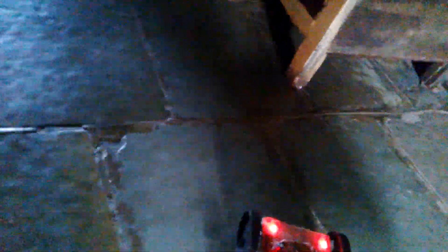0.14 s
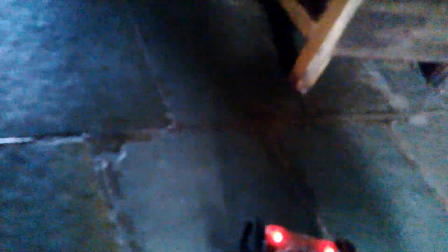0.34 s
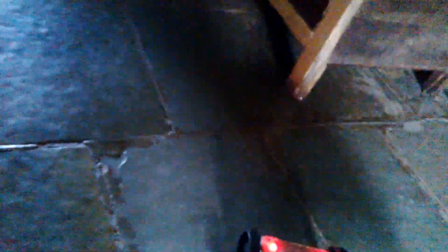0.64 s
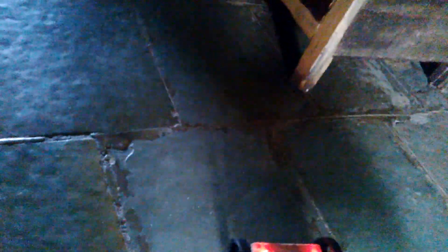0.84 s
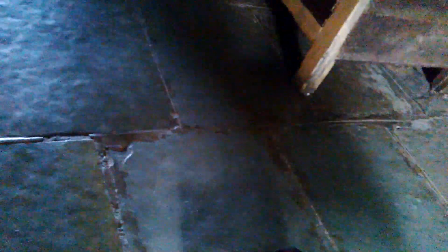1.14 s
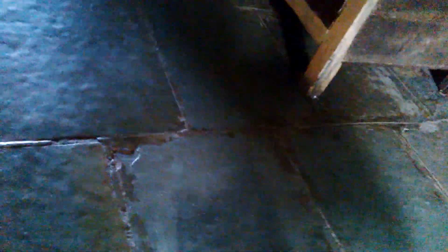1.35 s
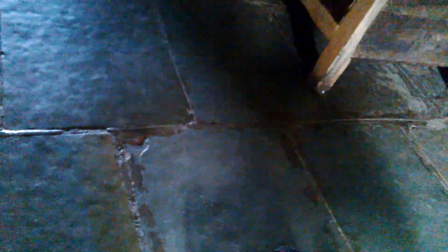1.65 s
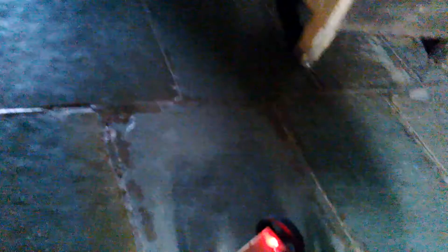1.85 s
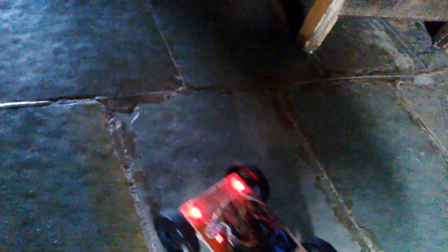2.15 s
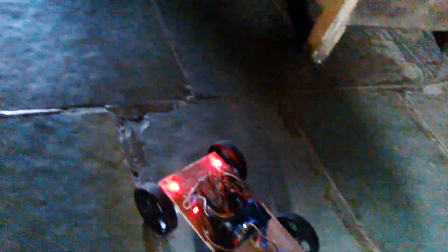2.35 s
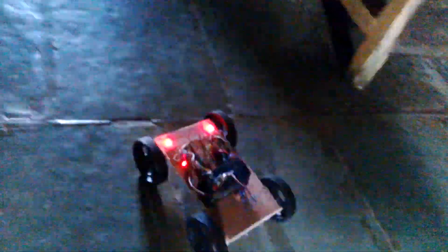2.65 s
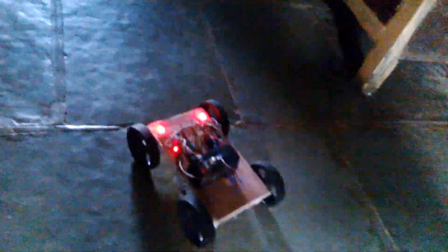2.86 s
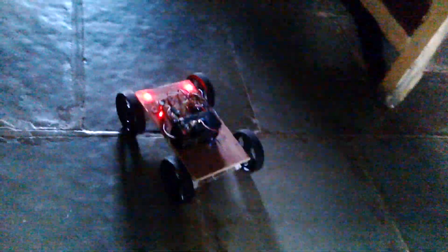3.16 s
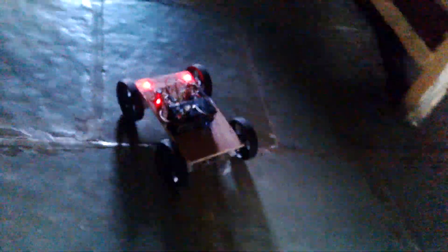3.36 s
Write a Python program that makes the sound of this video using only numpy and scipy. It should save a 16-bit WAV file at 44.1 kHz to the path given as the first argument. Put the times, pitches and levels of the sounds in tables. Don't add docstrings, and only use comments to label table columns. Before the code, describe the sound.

Small electric gear motors of a toy robot car whir in two bursts on a stone floor

```python
import sys
import numpy as np
from scipy import signal
from scipy.fft import rfft, irfft, next_fast_len
from scipy.io import wavfile
from scipy.ndimage import uniform_filter1d, map_coordinates

SR = 44100
rng = np.random.default_rng(int(sys.argv[2]) if len(sys.argv) > 2 else 0)


def int16_out(signal):
    q = np.round(np.clip(np.atleast_2d(signal).T, -1, 1) * 32767)
    wavfile.write(sys.argv[1], SR, q.astype(np.int16))


def magnitude_from_level(level_db):
    exponent = np.asarray(level_db, float) / 20
    return 10 ** exponent


N = 154350
T = np.arange(N) / SR


def unit(x):
    return x / np.sqrt(np.mean(x ** 2) + 1e-20)


def along(points, hz):
    f, v = np.transpose(points)
    return np.interp(np.log(hz + 1), np.log(f + 1), v)


def curves(rows):
    s, *cols = np.transpose(rows)
    return [np.interp(T, s, c) for c in cols]


def wobble(rate):
    return map_coordinates(rng.standard_normal(500), [np.clip(T * rate, 0, 498)])


def filtered(x, response):
    m = next_fast_len(N + SR // 2)
    return irfft(rfft(x, m) * response(np.fft.rfftfreq(m, 1 / SR)), m)[..., :N]


def patchy(x, depth_db):
    z = signal.stft(x, nperseg=512)[2]
    field = rng.standard_normal(z.shape[-2:])
    field = uniform_filter1d(field, size=3, axis=0)
    field = uniform_filter1d(field, size=7, axis=1)
    return signal.istft(z * magnitude_from_level(depth_db * unit(field)), nperseg=512)[1][..., :N]


def spread(pair, alike):
    def mixing(hz):
        turn = np.arccos(np.clip(along(alike, hz), -1, 1)) / 2
        return np.array([np.cos(turn), np.sin(turn)])

    mid, side = filtered(pair, mixing)
    return np.array([mid + side, mid - side])


def hush(spectrum, alike):
    noise = spread(rng.standard_normal((2, N)), alike)
    return unit(filtered(noise, lambda hz: magnitude_from_level(along(spectrum, hz))))


def ring(x, hz, width):
    return filtered(x, lambda f: 1j * f * width / (hz * hz - f * f + 1j * f * width))


def air(alike):
    # f/Hz, level/dB
    hush_spectrum = [(15, -31), (25, -7.5), (264, -10), (354, -6.5), (573, -14), (1210, -18), (8780, -27),
                     (11800, -30), (15000, -38)]
    # f/Hz, level/dB
    rumble_spectrum = [(15, -39), (25, -1), (86, -1), (140, -2), (180, -53), (310, -120)]
    return magnitude_from_level(-52.5) * patchy(hush(hush_spectrum, alike), 2.9) + magnitude_from_level(-65) * hush(rumble_spectrum, alike)


def rustle(alike):
    # f/Hz, level/dB
    spectrum = [(530, -47), (900, -23), (1010, -20), (1380, -5), (4210, -4.5), (12600, -15), (13000, -25)]
    # t/s, level/dB
    swell = [(0, -68), (.12, -52.5), (.41, -52.5), (.49, -65), (.6, -85)]
    level_db = curves(swell)[0] + 1.4 * np.tanh(wobble(29.0))
    return magnitude_from_level(level_db) * patchy(hush(spectrum, alike), 4.4)


def creak():
    # t/s, f/Hz, level/dB
    glide = [(.26, 266.6, -66), (.3, 301, -58), (.345, 331, -43.5), (.4, 334, -63), (.45, 383, -60),
             (.5, 380, -91.5)]
    hz, db = curves(glide)
    phase = 2 * np.pi * np.cumsum(hz * (1 + 0.061 * wobble(58.7))) / SR
    octave = magnitude_from_level(-5 + 4 * wobble(28.0)) * np.sin(2 * phase)
    started = T > glide[0][0] - .03
    return magnitude_from_level(db) * started * (np.sin(phase) + octave) * [[1.2], [.6]]


def whine():
    # f/Hz, level/dB
    tones = [(12118, -68.5)]
    return sum(magnitude_from_level(db + 5.0 + 1.5 * wobble(6.8)) * np.sin(2 * np.pi * f * T) for f, db in tones)


def background():
    alike = [(60, 0.59), (640, 0.73), (1400, 0.37), (5000, 0.056)]  # f/Hz, coherence
    return air(alike) + rustle(alike) + creak() + whine()


def room(x):
    # f/Hz, t60/s
    decay = [(150, 1), (500, 0.66), (2000, 0.81), (8000, 0.59), (14000, 0.39)]
    out, step = np.zeros((2, N + 2 * SR)), SR // 4
    for at in range(2 * step, N, step):
        hz, t, z = signal.stft(rng.standard_normal((2, SR)), SR, nperseg=256)
        tail = signal.istft(z * magnitude_from_level(-60 * t / along(decay, hz)[:, None]), SR, nperseg=256)[1]
        piece = x[:, at - step:at + step]
        piece = piece * np.sqrt(np.hanning(2 * step))[:piece.shape[1]]
        wet = signal.fftconvolve(piece, tail / np.linalg.norm(tail[0]), axes=1)
        out[:, at - step + 300:][:, :wet.shape[1]] += wet
    return out[:, :N]


def clicks():
    # t/s, peak level/dB
    ticks = [
        (0.5875, -37.5),
        (0.656, -36),
        (1.8195, -32),
        (1.838, -35),
        (1.8851, -34),
    ]
    # f/Hz, level/dB
    colour = [(1000, -7), (4000, -2), (9000, 0), (14000, -4)]
    shape = sum(magnitude_from_level(db - 60 * np.clip(T - s, 0, 1) / 0.015) * (T >= s) for s, db in ticks)
    return shape * unit(filtered(rng.standard_normal((2, N)), lambda hz: magnitude_from_level(along(colour, hz))))


def teeth():
    contacts_per_s, scatter_db = 5000, 2.5
    hit = rng.random((2, N)) < contacts_per_s / SR
    size = magnitude_from_level(scatter_db * rng.standard_normal((2, N))) * rng.choice([-1, 1], (2, N))
    return unit(hit * size)


def creep():
    # start t/s, end t/s, first level/dB, last level/dB
    strains = [
        (.5875, 0.66, -51, -49),
        (1.818, 1.92, -45, -36),
    ]
    # f/Hz, level/dB
    colour = [(700, -17), (1200, -11), (3500, -2), (5000, -10.5), (9000, -9), (15800, -12)]
    shape = sum(magnitude_from_level(np.interp(T, [a, b], [first_db, last_db])) * (T > a) * (T < b)
                for a, b, first_db, last_db in strains)
    return shape * unit(filtered(patchy(teeth(), 2.6), lambda hz: magnitude_from_level(along(colour, hz))))


def windings():
    # t/s, level/dB
    strength = [(.56, -68), (.59, -50.5), (.66, -66), (.8, -37), (1.38, -40), (1.5, -53), (1.8, -57),
                (1.85, -51), (1.9, -39), (1.95, -39), (2.1, -46), (2.2, -57), (3.5, -35.5)]
    buzz_hz, width_hz = 950, 200
    buzz = ring(ring(rng.standard_normal((2, N)), buzz_hz, width_hz), buzz_hz, width_hz)
    return magnitude_from_level(curves(strength)[0] + 1.5 * wobble(20)) * unit(buzz)


def judders():
    # t/s, f/Hz, length/s, level/dB
    chassis_flares = [(0.696, 538, 0.02, -25.5), (0.742, 581, 0.051, -30), (0.846, 775, 0.021, -23.5),
                      (1.127, 818, 0.012, -21), (1.185, 624, 0.008, -15), (1.265, 926, 0.014, -20),
                      (1.311, 624, 0.012, -19.5), (1.333, 904, 0.018, -23.9), (1.359, 624, 0.023, -34),
                      (1.401, 495, 0.011, -21), (1.854, 754, 0.012, -44.5), (1.918, 517, 0.014, -24.5),
                      (1.948, 969, 0.018, -25.5), (1.952, 603, 0.013, -27), (1.972, 947, 0.008, -26),
                      (2.045, 883, 0.035, -27), (2.069, 969, 0.021, -24.5), (2.105, 689, 0.036, -28.5),
                      (2.111, 947, 0.016, -27.2), (2.129, 517, 0.02, -25.9), (2.221, 732, 0.036, -25),
                      (2.235, 560, 0.034, -25.5), (2.251, 732, 0.013, -22.2), (2.319, 775, 0.019, -20.5),
                      (2.351, 754, 0.018, -21), (2.428, 754, 0.017, -18.5), (2.452, 775, 0.037, -26),
                      (2.544, 775, 0.012, -20), (2.598, 775, 0.026, -29), (2.62, 624, 0.11, -34),
                      (2.644, 603, 0.044, -26), (2.67, 624, 0.044, -31.5), (2.734, 624, 0.009, -20),
                      (3.021, 754, 0.018, -18.5), (3.059, 775, 0.01, -24), (3.151, 754, 0.016, -30),
                      (3.231, 754, 0.018, -21), (3.293, 603, 0.022, -22)]
    # t/s, f/Hz, length/s, level/dB
    mount_flares = [(0.676, 1938, 0.012, -25.5), (0.76, 2929, 0.022, -30), (0.882, 2304, 0.022, -21),
                    (0.942, 2778, 0.016, -39), (1.109, 2525, 0.049, -26.5), (1.389, 2907, 0.012, -22),
                    (1.854, 3424, 0.012, -47), (1.878, 3480, 0.022, -38), (1.944, 2024, 0.016, -26.5),
                    (1.974, 2730, 0.01, -29), (2.055, 2562, 0.0097, -23), (2.059, 3380, 0.05, -25.5),
                    (2.075, 3650, 0.012, -20), (2.349, 1507, 0.038, -25.5), (2.528, 2476, 0.016, -25.5),
                    (2.608, 2440, 0.013, -23.5), (2.674, 3100, 0.016, -25), (2.812, 1620, 0.013, -28.3),
                    (2.899, 2110, 0.01, -21), (2.911, 1852, 0.012, -20), (3.045, 1873, 0.0059, -15.5),
                    (3.199, 1760, 0.035, -26), (3.283, 4500, 0.031, -27), (3.346, 1895, 0.014, -21),
                    (3.37, 2140, 0.044, -27.7), (3.38, 1787, 0.026, -27.1), (3.462, 1790, 0.01, -31),
                    (3.494, 1620, 0.008, -26)]
    drift_share, swing_db, trim_db = .03, 2.8, 0.5
    out, span = np.zeros(N + SR), np.arange(-SR // 10, SR // 10)
    for s, hz, length, db in list(chassis_flares) + list(mount_flares):
        knots = rng.standard_normal((2, 20))
        drift, swing = (map_coordinates(row, [np.linspace(0, 19, len(span))]) for row in knots)
        spread_s = length * np.where(span < 0, .38, .45)
        shape = np.exp(-.5 * (span / SR / spread_s) ** 2)
        phase = 2 * np.pi * np.cumsum(hz * (1 + drift_share * drift)) / SR
        out[round(s * SR) + span] += magnitude_from_level(db + swing_db * np.tanh(swing)) * shape * np.sin(phase)
    return np.sqrt(2) * magnitude_from_level(trim_db) * np.array([out[:N], 0.14 * out[:N]])


def chassis(knocks, modes):
    swing_db, swing_per_s = 5, 45
    body = 0
    for hz, width, db in modes:
        drive = knocks * magnitude_from_level(swing_db * np.tanh(wobble(swing_per_s)))
        body = body + magnitude_from_level(db) * ring(ring(drive, hz, 1.12 * width), hz, 1.12 * width)
    return unit(body)


def housing(colour):
    return unit(filtered(patchy(teeth(), 3), lambda hz: magnitude_from_level(along(colour, hz))))


def motors():
    # t/s, effort level/dB, level of gearboxes facing the microphone/dB
    legs = [
        [(.66, -47, 1), (.672, -37, 5), (.69, -27, 2.5), (.82, -24.5, 3), (.91, -18, -2), (1.07, -22.5, -1),
         (1.2, -17.5, -3), (1.34, -19, -1.5), (1.4, -20.5, -7.5)],
        [(1.905, -34, -5.5), (1.95, -22.5, -1), (2.015, -30, 4), (2.055, -21, -2.5), (2.16, -23.5, -1),
         (2.25, -21, 0), (2.29, -24.5, 1)],
        [(2.31, -25, 0), (2.39, -20.5, 0.089), (2.46, -21.5, 0), (2.5, -24, 0), (2.57, -21, 0),
         (2.62, -21, -0.067), (2.69, -22.5, 0), (2.74, -26, -0.5)],
        [(2.76, -21.5, -2), (2.82, -20, 2.5), (2.905, -18.5, 2.5), (2.94, -20.5, -1.4), (3.07, -20.5, 1.5),
         (3.16, -21.5, 0.5), (3.22, -21.5, 0), (3.3, -20.5, -0.8), (3.5, -20.5, -0.5)],
    ]
    # t/s, heading (0 back, 1 forward, 2 turned)
    heading_path = [(1.6, 0.27), (1.7, 0.66), (2.72, 1.03), (2.84, 2.1)]
    # f/Hz, width/Hz, level/dB
    backing = [(538, 29, -10), (626, 60, 1.5), (712, 112, -0.5), (893, 100, -1), (2423, 73, -6),
               (2840, 720, -4.5)]
    forward = [(276, 86, -5), (573, 135, 1.5), (764.5, 100, 4.5), (1519, 34, -5), (2340, 710, -4),
               (3370, 410, -3), (6400, 290, -12), (9600, 900, -9.5)]
    turned = [(287, 83, -10), (596, 110, -1), (747, 116, 0), (924, 110, -15.5), (1542, 59, -7),
              (1766, 530, -4), (2150, 61, -10), (4440, 570, -8), (9700, 570, -8.5), (10840, 860, -9)]
    # f/Hz, level/dB
    colours = [
        [(88, -46), (150, -20.5), (486, -8.5), (608, -10), (1280, -9.5), (2870, -8), (10200, -10.5),
         (13000, -17), (15500, -22)],
        [(88, -38), (150, -24.5), (273, -11), (411, -12), (761, -8.5), (1250, -18), (3450, -13.5), (13000, -17)],
        [(88, -59), (150, -26), (761, -6), (1260, -17.5), (1830, -15), (2660, -11), (4570, -10.5),
         (13000, -14.5)],
    ]
    effort, facing_db = np.zeros(N), np.zeros(N)
    for leg in legs:
        level_db, face_db = curves(leg)
        on = (T > leg[0][0] - .011) & (T < leg[-1][0] + .011)
        effort[on], facing_db[on] = magnitude_from_level(level_db)[on], face_db[on]
    effort = uniform_filter1d(effort, size=200) * magnitude_from_level(0.84 * wobble(14))
    heading, = curves(heading_path)
    knocks, body, fizz = teeth(), 0, 0
    for k, (modes, colour) in enumerate(zip([backing, forward, turned], colours)):
        share = np.sqrt(np.clip(1 - abs(heading - k), 0, 1))
        body = body + share * chassis(knocks, modes)
        fizz = fizz + share * housing(colour)
    whir = magnitude_from_level(-4) * body + magnitude_from_level(3 + facing_db) * fizz
    roll_hz, rise_s = 380, 0.075
    roll = filtered(whir, lambda hz: 1 / (1 + (hz / roll_hz) ** 8))
    slow = sum(np.clip(1 - abs(T - leg[0][0]) / rise_s, 0, 1) ** .5 for leg in legs[:2])
    return effort * (whir - slow * roll)


def scene():
    # f/Hz, coherence
    direct_alike = [(150, 1), (600, 0.85), (1400, 0.72), (2800, 0.34), (5000, 0.27)]
    # f/Hz, level difference/dB
    right_db = [(300, 1.9), (1200, 4.1), (4000, 0.37)]
    drive, flares = motors() + creep() + windings() + clicks(), judders()
    wet = room(spread(drive + .35 * flares, direct_alike))
    wet = spread(wet, [(150, 0.94), (700, 0.76), (2000, 0.18)])
    heard = spread(drive + flares, direct_alike) + magnitude_from_level(-4.5) * wet
    side = np.array([[-.5], [.5]])

    def place(lag_s):
        def response(hz):
            delay = np.exp(2j * np.pi * np.minimum(hz, 3500) * side * lag_s)
            return magnitude_from_level(side * along(right_db, hz)) * delay
        return filtered(heard, response)

    ahead = np.clip((T - 2) / 1.22, 0, 1)
    car = (1 - ahead) * place(0.000097) + ahead * place(.00003)
    return car + background() * magnitude_from_level(side * 1.8)


def low_pass(x):
    return signal.sosfilt(signal.butter(12, 15850, fs=SR, output="sos"), x)


def record(dry):
    # f/Hz, level/dB
    response = [(12500, 0.5), (14000, -6.5), (15200, -6), (15800, -11)]
    ceiling, top_hz = .9, 15830
    held = dry / (1 + abs(dry / ceiling) ** 4) ** 0.24
    heard = filtered(held, lambda hz: magnitude_from_level(along(response, hz)) * (hz < top_hz))
    return low_pass(heard)


dry = scene()
out = record(dry)
int16_out(out)
```